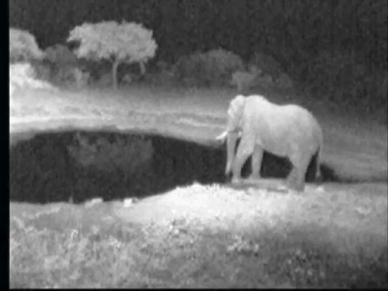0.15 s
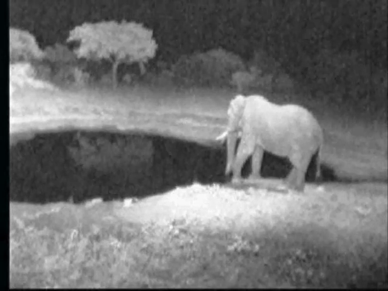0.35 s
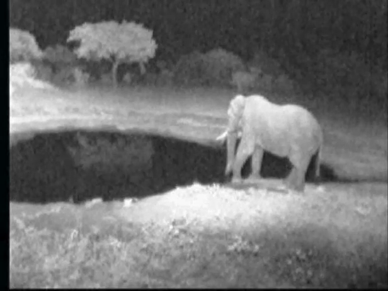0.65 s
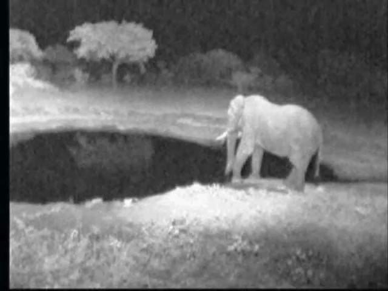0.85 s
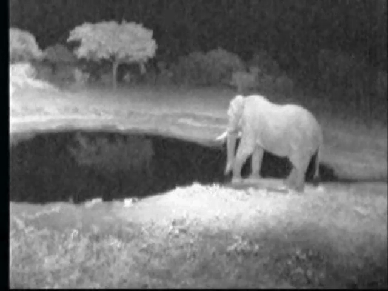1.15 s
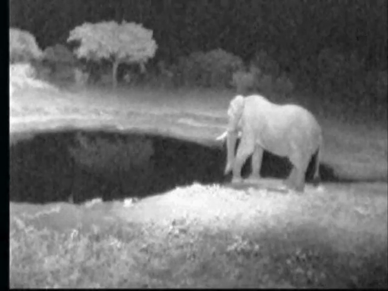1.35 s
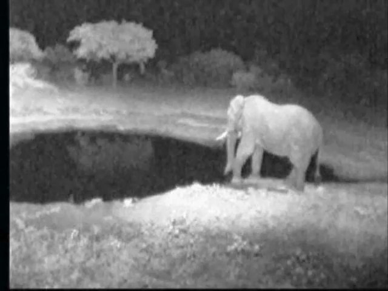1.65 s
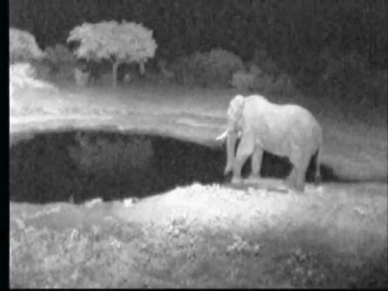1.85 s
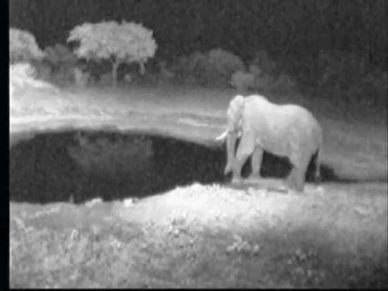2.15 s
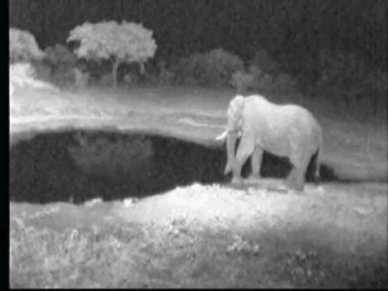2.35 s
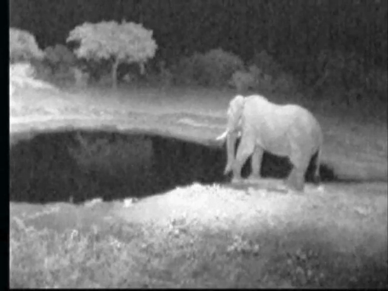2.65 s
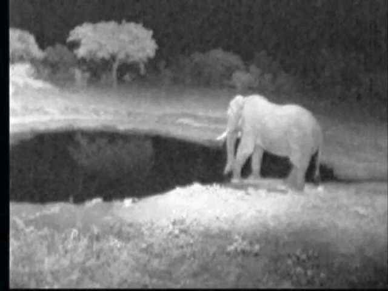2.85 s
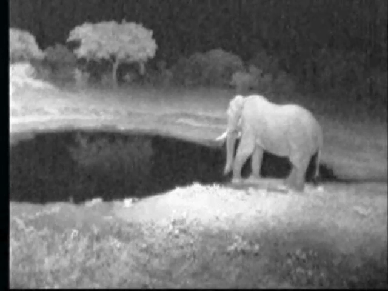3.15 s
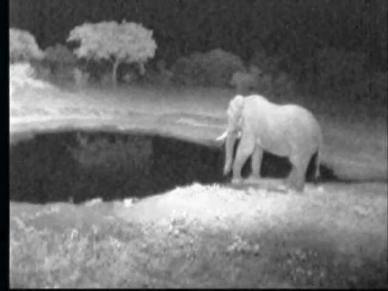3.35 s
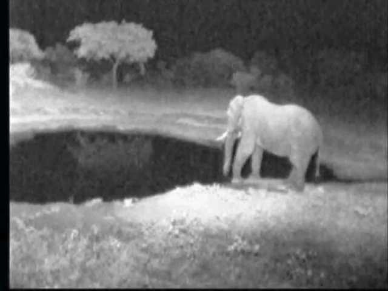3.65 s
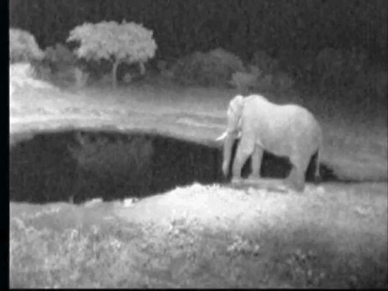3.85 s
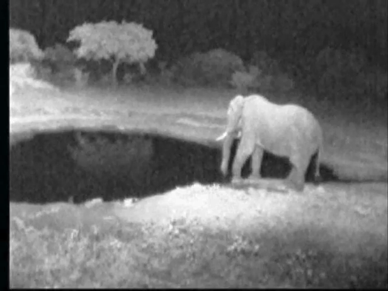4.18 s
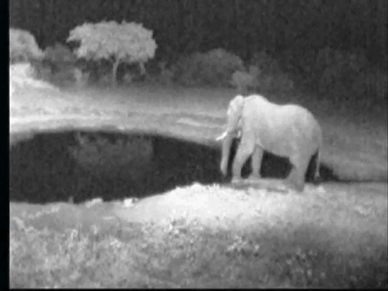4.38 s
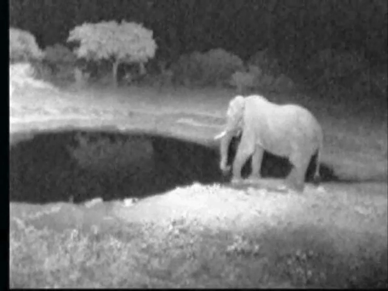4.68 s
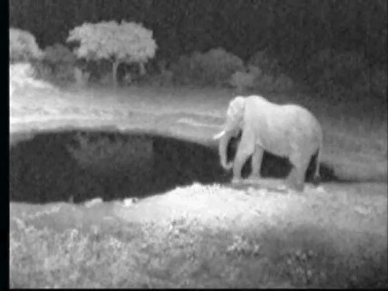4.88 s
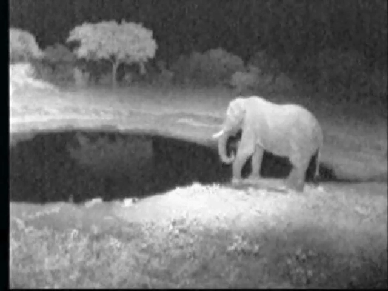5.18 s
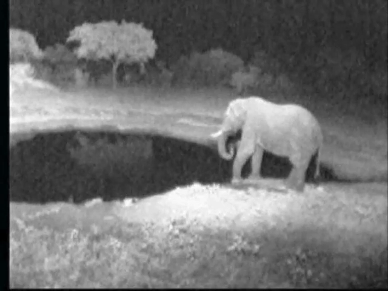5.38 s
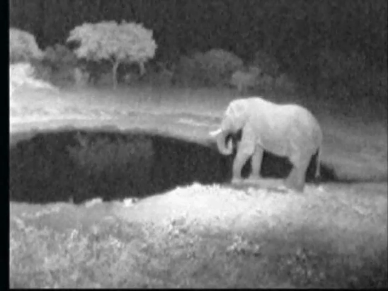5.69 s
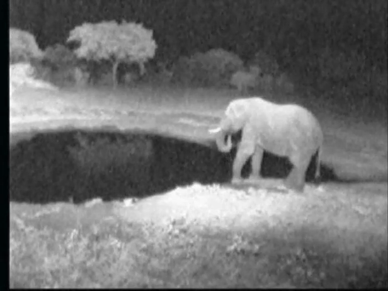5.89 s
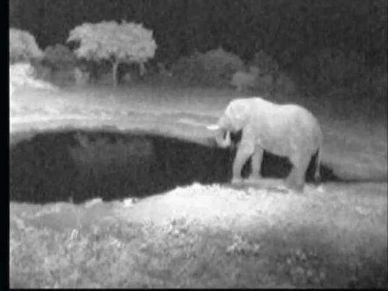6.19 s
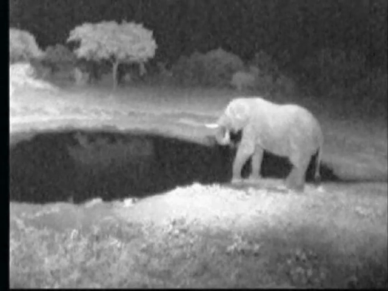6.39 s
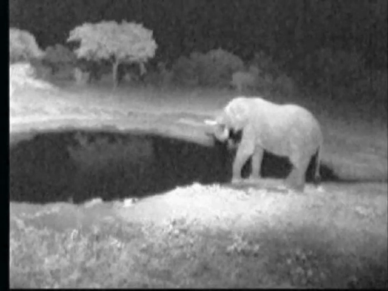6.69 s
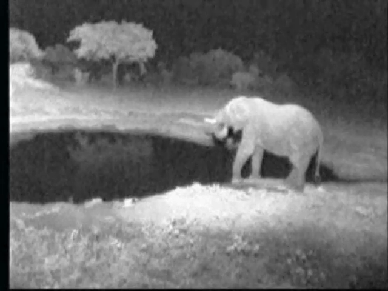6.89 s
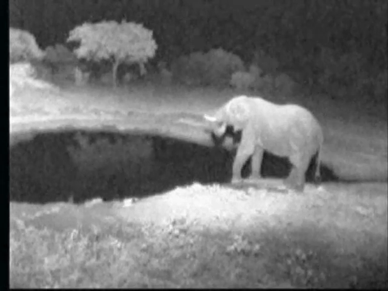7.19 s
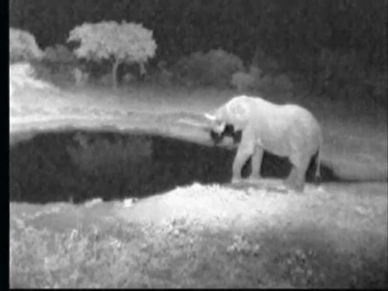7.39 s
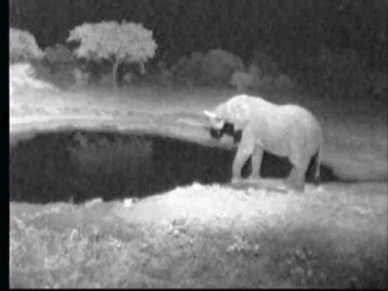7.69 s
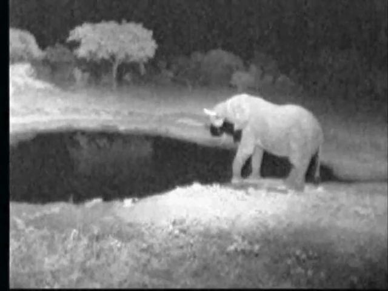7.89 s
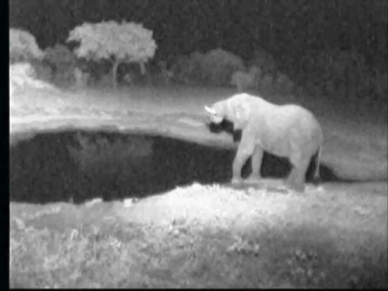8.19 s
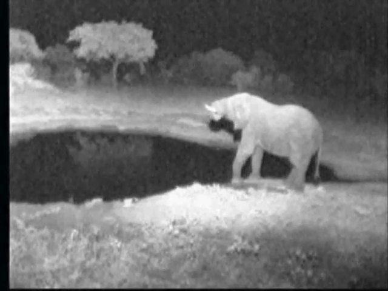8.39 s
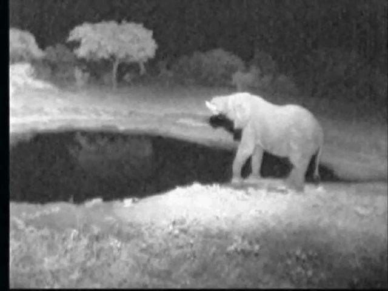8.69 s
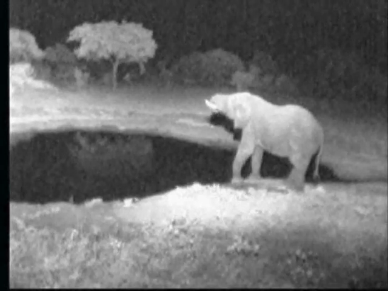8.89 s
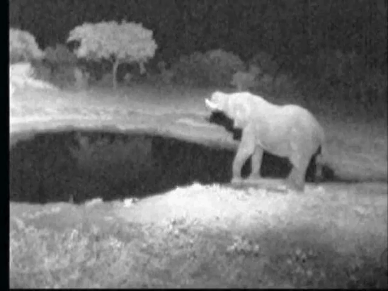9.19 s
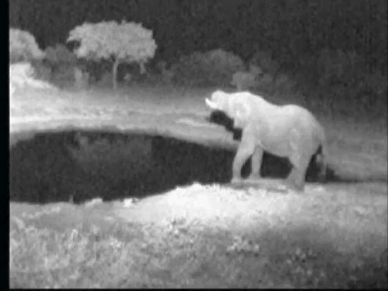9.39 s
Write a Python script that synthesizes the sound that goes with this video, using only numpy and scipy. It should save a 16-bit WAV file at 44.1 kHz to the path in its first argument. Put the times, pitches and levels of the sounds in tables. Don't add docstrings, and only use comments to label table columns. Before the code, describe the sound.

At a night waterhole, an elephant's trunk stirs and flings water in hissing splashes, then quiets to drips. Spills and slaps follow, then rapid hollow gulps as the trunk empties, ending in a sustained hard gush into the mouth. Reed frogs whistle pulsed trills near and far over a throbbing chorus. The outdoor microphone sounds coarse, buzzing and overloaded, with metallic treble.

```python
import sys
import numpy as np
from scipy import signal
from scipy.io import wavfile
from scipy.ndimage import uniform_filter1d

SR = 44100
rng = np.random.default_rng(int(sys.argv[2]) if len(sys.argv) > 2 else 0)


def volts(x):
    e = np.asarray(x, float) / 20
    return 10 ** e


def store_pcm(level_fs):
    pcm = np.round(np.clip(level_fs, -1, 1) * 32767).astype(np.int16)
    wavfile.write(sys.argv[1], SR, np.atleast_2d(pcm).T)


N = 420713


def read(points, hz):
    f, value = np.transpose(points)
    return np.interp(np.log(hz + 1), np.log(f + 1), value)


def follow(rows):
    s, *columns = np.transpose(rows)
    t = np.arange(N) / SR
    return [np.interp(t, s, c, left=-120, right=c[-1] if s[-1] > 9.5 else -120) for c in columns]


def evened(x):
    return x / np.sqrt(np.mean(x ** 2) + 1e-20)


def smooth(x, size):
    return uniform_filter1d(uniform_filter1d(x, size), size)


def add(mix, s, sound):
    at = round(s * SR)
    part = mix[max(at, 0):][:max(len(sound) + min(at, 0), 0)]
    part += sound[max(-at, 0):][:len(part)]


def resonate(x, hz, width):
    return signal.lfilter(*signal.iirpeak(hz, hz / width, SR), x)


def gliding(x, hz, width):
    turn, r = np.exp(2j * np.pi * np.cumsum(hz) / SR), np.exp(-np.pi * width / SR)
    once = signal.lfilter([1 - r], [1, -r], x / turn)
    return (turn * signal.lfilter([1 - r], [1, -r], once)).real


def band(x, lo_hz, hi_hz):
    return signal.sosfilt(signal.butter(2, [lo_hz, hi_hz], "band", fs=SR, output="sos"), x)


def hiss():
    return rng.standard_normal(N)


def lumps(ms, db):
    return volts(db * evened(smooth(hiss(), int(ms * SR / 1000))))


def noise(points, patchy_db):
    hz = np.fft.rfftfreq(512, 1 / SR)
    a, b, patches = rng.standard_normal((N // 128 + 5, 257, 3)).T
    patches = evened(uniform_filter1d(uniform_filter1d(patches, 5, 0), 6, 1))
    z = (a + 1j * b) * volts(read(points, hz)[:, None] + patchy_db * patches)
    return evened(signal.istft(z, nperseg=512, noverlap=384)[1][:N])


def bubbles(per_s, lo_hz, hi_hz, cycles, spread_db):
    out = np.zeros(N)
    for hz in np.geomspace(lo_hz, hi_hz, 10):
        born = rng.random(N) < per_s / 10 / SR
        size = volts(spread_db * np.minimum(rng.exponential(1, N), 4)) * born
        u = np.arange(2048) / SR * hz / cycles
        ring = np.sin(2 * np.pi * cycles * u * (1 + 0.076 * u))
        out += signal.oaconvolve(size, u * np.exp(-3 * u) * ring)[:N]
    return evened(out)


SURGE_DB = 33


def surge(s, db, rise_s, fall_s):
    late = np.arange(N) / SR - s
    return volts(db - SURGE_DB * np.where(late < 0, -late / rise_s, late / fall_s))


# f/Hz, level/dB per Hz
NIGHT_AIR = [(12, -28), (20, 2), (54, -14.5), (253, -14), (396, -26.5), (550, -11), (1040, -19),
             (1960, -17), (2200, -14), (5500, -13.5), (7150, -50), (12100, -120)]


def night():
    return volts(-38) * noise(NIGHT_AIR, 0.52)


# multiple of MAINS_HZ, level/dB
ODD_HUM = [(3, -6), (5, -5.5), (7, -17.5), (9, -15), (11, -10), (13, -17), (15, -18), (17, -23), (23, -30),
           (27, -17)]
# t/s, level/dB
ODD_HUM_SWELL = [(0.0, -46.5), (2.97, -41), (6.48, -34), (9.54, -33.5)]
# multiple of MAINS_HZ, level/dB
STEADY_HUM = [(1, -50.5), (2, -48.5), (4, -57)]
MAINS_HZ = 50.1


def hum():
    turn = 2 * np.pi * MAINS_HZ * np.arange(N) / SR
    odd = sum(volts(db) * np.sin(k * turn + 6 * rng.random()) for k, db in ODD_HUM)
    steady = sum(volts(db) * np.sin(k * turn + 6 * rng.random()) for k, db in STEADY_HUM)
    return np.sqrt(2) * (volts(follow(ODD_HUM_SWELL)[0]) * odd + steady)


CROAK_DB, CHORUS_DB = -34, -36.5


def chorus():
    low = resonate(resonate(hiss(), 2210, 130), 2210, 190) * lumps(9, 2) * lumps(150, 1.8)
    beside = resonate(resonate(hiss(), 2430, 150), 2430, 200) * lumps(9, 2.5) * lumps(200, 3)
    high = band(hiss(), 3990, 4680) * lumps(2.7, 2) * lumps(130, 1.5)
    croaks = evened(low) + volts(-11.5) * evened(beside)
    return volts(CROAK_DB) * croaks + volts(CHORUS_DB) * evened(high)


LEAD_DB_PER_S = 40
FULL_PULSE_S = .0133


def trill(last, length, ms, hz, full_db, start_db, full_s, grow_s, sweep,
          lag_s=.001, pulse_s=FULL_PULSE_S, sag_db=0):
    out, wobbles = np.zeros(N), rng.random((30, 3))
    for back, wobble in zip(np.arange(0, length, ms / 1000), wobbles):
        grown = np.clip(1 - (back - full_s) / grow_s, 0, 1)
        t = np.arange(0, .008 + (pulse_s - .008) * grown + .0025 * (back == 0), 1 / SR)
        end, middle = t[-1], t[-1] / 2
        glide = hz * (.955 + .045 * grown) + sweep * (middle - t) - 1200000 * (t - middle) ** 2
        turn = 2 * np.pi * (np.cumsum(np.maximum(glide, 3620)) / SR + wobble[1])
        swell = np.minimum(t / .003, 1) * np.sin(np.pi / 2 * np.minimum((end - t) / .0025, 1))
        swell = swell * volts(sag_db * np.maximum(t / end - .25, 0))
        lead = LEAD_DB_PER_S * max(back - full_s - grow_s, 0)
        db = full_db + start_db * (1 - grown) - lead + 1.5 * (wobble[0] - .5)
        start = last - back - middle + .0005 + lag_s * (1 - grown) + .0008 * (wobble[2] - .5)
        add(out, start, volts(db) * swell * np.sin(turn))
    return out


# t/s of last pulse's middle, length/s, pulse spacing/ms, f/Hz, full level/dB
REED_FROGS = [(.198, .3, 22.1, 4150, -14.5), (.078, .2, 22.4, 4480, -18), (1.992, .23, 22, 4090, -12),
              (2.692, .18, 20.8, 4570, -15.5), (2.792, .18, 21, 4400, -17.5), (2.994, .19, 21.7, 4350, -13),
              (3.1485, .28, 22, 4275, -13), (3.188, .13, 22, 4700, -19), (3.688, .3, 21, 4180, -18.5),
              (3.8145, .14, 21.6, 4680, -23), (4.08, .17, 20.9, 4000, -30), (5.004, .26, 22, 4080, -16),
              (5.6235, .17, 22.2, 4110, -14.5), (5.838, .2, 20.2, 4600, -20), (4.86, .17, 21.5, 4380, -19),
              (2.05, .12, 21, 4650, -20), (6.611, .21, 20.7, 4320, -20), (7.34, .13, 21, 4400, -18),
              (7.534, .27, 23, 4120, -22),
              (5.156, .2, 21.7, 4500, -17), (2.6, .13, 21.3, 4450, -19), (2.85, .26, 22, 4050, -23),
                 (2.95, .14, 21.2, 4600, -18), (3.45, .16, 21.4, 4150, -25), (3.83, .14, 22, 4020, -29),
                 (5.54, .09, 22, 4680, -18), (6.05, .2, 21, 4600, -23), (5.962, .1, 21, 4420, -15),
                 (.265, .05, 22, 4250, -25), (8.911, .19, 22.2, 4150, -10), (4.95, .1, 22, 4300, -21)]


def reed_frogs():
    return sum(trill(*row, start_db=-4.5, full_s=.45 * row[1], grow_s=.55 * row[1], sweep=43000, lag_s=0)
               for row in REED_FROGS)


# t/s of last pulse's middle, length/s, pulse spacing/ms, f/Hz, full level/dB
NEAR_FROGS = [(1.502, .3, 21.5, 4425, -2), (2.3388, .24, 21.5, 4400, -3.5), (4.5115, .32, 21.5, 4365, -2.2),
              (6.2765, .4, 21.4, 4366, -.6)]
LATE_FROGS = [(7.197, .23, 20.7, 4500, -9), (9.287, .33, 21.5, 4400, -3.5)]
# t/s of last pulse's middle, length/s, f/Hz, full level/dB
BANK_FROG = [(2.204, .27, 4235, 0), (5.214, 0.29, 4194, -2.5), (8.347, .33, 4224, -2.5)]
NEAR_START_DB, NEAR_SWEEP = -5.5, 58000
NEAR_FULL_S, NEAR_GROW_S = .17, .045


def near_frogs():
    out = np.zeros(N)
    for row in NEAR_FROGS:
        out += trill(*row, NEAR_START_DB, NEAR_FULL_S, NEAR_GROW_S, NEAR_SWEEP)
    for row in LATE_FROGS:
        out += trill(*row, NEAR_START_DB, .45 * row[1], .06, NEAR_SWEEP)
    for s, length, hz, db in BANK_FROG:
        out += trill(s, length, 22.2, hz, db, NEAR_START_DB, NEAR_FULL_S, NEAR_GROW_S,
                     sweep=60000, pulse_s=.012, sag_db=-10)
    return out


def frogs():
    near, far = near_frogs(), reed_frogs()
    t = np.arange(8000) / SR
    reeds = rng.standard_normal(len(t)) * volts(-60 * t / 0.52) * (t > .002)
    echo = signal.oaconvolve(volts(-20) * near + volts(-7) * far, reeds / np.linalg.norm(reeds))[:N]
    bounce = volts(-13) * np.roll(near, round(0.0042 * SR))
    return near + far * lumps(3.4, .9) + echo + bounce


# peak t/s, level/dB, rise/s, fall/s
AIR_BLASTS = [(1.042, -48.5, 0.34, 0.22), (1.18, -37, 0.033, .6), (1.35, -33, 0.31, 0.24),
              (4.15, -53, .03, .6), (4.22, -49, .1, .2), (4.304, -47, 0.33, 0.16), (7.308, -48, 0.44, .15),
              (8.459, -25.5, 0.045, 0.051), (8.654, -51, 0.12, .2), (9.2, -45, 0.28, 0.39)]


def blasts():
    puff = evened(band(hiss(), 17, 150) * lumps(30, 2.2))
    return volts(9) * sum(surge(*row) for row in AIR_BLASTS) * puff


THUMP_S, THUMP_DB, THUMP_HZ = 8.446, -14, 32


def thump():
    out, t = np.zeros(N), np.arange(0, 1.3 / THUMP_HZ, 1 / SR)
    add(out, THUMP_S, volts(THUMP_DB) * np.sin(2 * np.pi * THUMP_HZ * t) * np.hanning(len(t)))
    return out


def slap(db, hz, low_db):
    t = np.arange(2200) / SR
    a, b, c = rng.standard_normal((3, len(t)))
    wide = evened(band(a, 2570, 4430)) * volts(-14) + evened(band(b, 660, 2000)) * volts(low_db - 22)
    wide = wide * volts(0.5 - 60 * np.maximum(t - 0.0023, 0) / 0.073)
    ring = evened(resonate(c, hz, 210)) * 0.22 + np.sin(2 * np.pi * hz * t * (1 + t)) * .5
    ring = ring * volts(-60 * t / 0.044)
    smack = volts(low_db / 3 - 12.5) * evened(band(c, 500, 5600)) * volts(-60 * t / 0.016)
    return volts(db + 1.5) * np.minimum(t / 0.0011, 1) * (wide + ring + smack)


# t/s, peak level/dB, ring f/Hz, low part level/dB re peak
POOL_SLAPS = [(0.2934, -10.5, 2430, -23), (0.5136, -11, 3300, 2), (.646, -13, 2890, -28),
              (0.881, -3, 3830, -20), (0.948, -11, 3240, -6), (1.733, -11, 1490, 8), (1.0274, -17, 3200, 0),
              (1.074, -9, 3240, -19), (1.1755, -4, 2560, -26), (5.412, -12, 2530, 17),
              (5.452, -24, 2860, -22), (5.657, -11, 2820, -23), (5.676, -9.5, 3570, -25),
              (5.735, -12.5, 2660, 8.5), (5.8205, -7, 2600, -25), (5.901, -6.5, 2650, -30),
              (6.525, -11.5, 2340, 12), (7.8065, -3.5, 2880, 7), (8.329, -31, 2720, -22),
              (8.4214, -11, 2720, 20.5)]
# t/s, peak level/dB, ring f/Hz
STREAM_SPATTER = [(0.3777, -10, 3320), (0.414, -8.5, 3580), (0.8544, -9, 2940), (6.709, -12, 2920),
                  (6.8786, -8, 2820), (7.632, -8.5, 2400), (7.753, 1.5, 3100), (7.8667, -9, 3060),
                  (7.8926, -8, 2610), (8.062, -10, 2590), (8.167, -10, 2420), (8.2594, -13, 3100),
                  (4.472, -13, 2760), (4.658, -11, 3300), (4.823, -16, 2470), (4.8411, -12, 2800),
                  (7.4127, -10, 3060), (7.575, -7, 3260), (7.7835, -9, 3220), (8.2814, -14, 3080),
                  (5.469, -4, 3500), (5.477, -6, 2000)]
# t/s after the start, peak level/dB, ring f/Hz
DRIBBLE_RHYTHM = [(-.001, -2.5, 3010), (.004, -1.5, 2630), (.0272, -1, 2390), (0.068, -1, 2650),
                  (.072, -0.5, 2950), (0.1153, -5, 2660), (.119, -1, 3000), (0.1587, 2.5, 2680),
                  (0.307, -0.5, 2600), (0.358, -5, 3280), (0.449, -8, 2770), (0.496, -7.5, 2470),
                  (.532, 1.5, 2760), (0.604, -7.5, 3320), (0.7, -10.5, 2550), (0.766, 0, 2770),
                  (.869, -7, 2670), (1.13, -11.5, 2940)]
# start t/s, level/dB
DRIBBLE_STARTS = [
    (4.1373, 0),
    (7.148, -3.5),
]
GOB_DB, GOB_THIN_DB_PER_S = 3, 65


def slaps():
    hits = [*POOL_SLAPS]
    for start, run_db in DRIBBLE_STARTS:
        for s, db, hz in DRIBBLE_RHYTHM:
            hits.append((start + s, db + run_db, hz, GOB_DB - GOB_THIN_DB_PER_S * s))
    for s, db, hz in STREAM_SPATTER:
        hits.append((s, db, hz, -22))
    out = np.zeros(N)
    for s, *shape in hits:
        add(out, s - .001, slap(*shape))
    return out


def note(db, start_hz, end_hz, length):
    u = np.linspace(0, 1, int(max(length, .008) * SR))
    turn = 2 * np.pi * np.cumsum(start_hz + (end_hz - start_hz) * u ** 1.37) / SR
    wet = volts(2.4 * evened(smooth(rng.standard_normal(len(u)), 200)))
    ratio, share, phase = rng.random(3)
    second = np.sin(turn * (1.17 + 0.074 * ratio) + 6 * phase)
    pair = np.sin(turn) + (0.11 + 0.2 * share) * second
    return volts(db - 5) * np.sin(np.pi * u ** 0.35) ** 2 * pair * wet


# t/s, peak level/dB, f/Hz
BIG_GLUGS = [(0.429, -12.5, 1306), (.721, -7, 1480), (.755, -9.5, 1600), (.69, -9, 1600), (1.618, -9, 702),
             (1.652, -10.5, 700), (1.682, -16, 720), (0.55, -4, 2500), (.565, -8, 1850), (3.066, -10, 533),
             (5.207, -17.5, 1510), (5.412, -6.5, 1600), (5.413, -16.5, 900), (5.414, -8, 1500),
             (5.918, -3, 638), (5.945, -13, 570), (6.011, -9, 570), (5.6, -19, 550), (6.085, -12, 470),
             (0.36, -27, 560), (6.1, -15, 560), (5.568, -19, 1820)]
# t/s, peak level/dB, f/Hz
TRUNK_GULPS = [(6.41, -25, 549), (6.463, -21, 568), (6.517, -13, 690), (6.551, -16.5, 685),
               (6.614, -5.5, 541), (6.645, -10, 602), (6.683, -2, 611), (6.795, 0, 575), (6.878, -4, 604),
               (6.909, -2.5, 629), (6.931, -2, 572), (6.982, -1, 546), (7.023, -4.5, 619), (7.059, -8, 608),
               (7.088, -4, 526), (7.224, -10, 577), (7.262, -15, 606), (7.298, -10, 500), (7.356, -15, 540),
               (7.397, -4, 632), (7.441, -11.5, 631), (7.509, -13.5, 552), (7.554, -8.5, 571),
               (7.59, -2, 536), (7.673, -9, 565), (7.699, -11, 604), (7.795, -17, 535), (7.864, -23, 535),
               (7.901, -13.5, 520), (7.952, -18, 790), (7.997, -18, 625), (8.04, -15.5, 704),
               (8.068, -19, 520), (8.102, -25, 850), (8.133, -15.5, 806), (8.243, -16, 525),
               (8.317, -21, 696), (8.384, -7, 744), (8.433, -19, 549), (8.466, -17, 637),
               (8.505, -5.5, 516), (8.535, 1, 538)]
# t/s, peak level/dB, start f/Hz, end f/Hz, length/s
AIR_PLOPS = [(0.326, -23, 950, 1050, 0.02), (.565, -16, 508, 560, 0.053), (0.659, -17, 670, 720, 0.057),
             (0.709, -14, 970, 1030, 0.06), (.74, -14, 932, 1050, 0.074), (0.978, -12, 560, 1500, 0.06),
             (1.021, -6, 1350, 5200, 0.026), (.962, -19, 1600, 2800, 0.018),
             (1.111, -12, 1030, 2520, 0.014), (1.44, -5.5, 623, 760, 0.029), (1.465, -11, 1270, 1500, 0.03),
             (4.204, -3, 630, 690, 0.012), (4.421, -12, 780, 890, 0.022), (4.136, -20, 640, 600, 0.015),
             (.42, -18, 1070, 1200, .02), (6.01, -17, 1200, 1300, 0.021), (8.44, 0, 2600, 2780, 0.035),
             (8.515, -2, 3340, 3570, 0.026), (8.63, -5, 3420, 3550, 0.067), (6.71, -15, 1870, 1910, 0.035),
             (1.65, -8, 1180, 1360, 0.05), (2.4, -35, 670, 700, 0.045), (2.42, -15.5, 2980, 3260, 0.04),
             (3.078, -8.5, 591, 517, 0.063), (4.55, -25, 560, 590, 0.055), (5.452, -8, 2920, 2570, 0.022),
             (5.467, -8, 1960, 2130, 0.022), (6.1, -16, 525, 560, 0.061), (5.685, -8.5, 530, 1030, 0.018),
             (5.917, -13, 950, 820, 0.029), (6.736, -20, 1126, 1160, 0.15), (6.925, 8, 515, 614, 0.06),
             (7.004, -16.5, 1084, 1290, 0.12), (7.215, -10, 1095, 1070, 0.054),
             (7.335, -9.5, 1070, 1110, 0.032), (8.33, -19, 725, 743, 0.18), (8.545, 5, 571, 604, 0.048)]


def big_bubbles():
    out = np.zeros(N)
    for s, db, hz in BIG_GLUGS:
        add(out, s - .003, note(db - 0.5, hz * .98, hz * 1.176, .022 + 14.7 / hz))
    for s, db, hz in TRUNK_GULPS:
        add(out, s - .003, note(db + 3.5, hz * .97, hz * 1.07, .022 + 14.7 / hz))
    for s, *shape in AIR_PLOPS:
        add(out, s, note(*shape))
    return out


def drops():
    return band(band(band(slaps() + big_bubbles(), 430, 9500), 420, 9500), 400, 9500)


# f/Hz, width/Hz, level/dB
THROAT = [(590, 133, -10), (1452, 100, -13), (2000, 110, -9), (2320, 92, -6.5), (3320, 110, -10),
          (5530, 450, -14)]
# t/s, level/dB
THROAT_LEVEL = [(8.4, -43), (8.6, -18.5), (8.93, -11.5), (8.99, -7.5), (9.24, -8.5), (9.54, -9)]
# t/s, lower f/Hz, upper f/Hz
SPLIT_CAVITY = [
    (8.4, 2620, 2700),
    (8.95, 2600, 2700),
    (9.03, 2510, 2900),
    (9.3, 2560, 2920),
    (9.4, 2680, 2800),
    (9.54, 2640, 2780),
]
# t/s, level/dB
THROAT_RUMBLE = [(8.4, -66), (8.456, -34.5), (9.54, -23.5)]


def jet():
    rush = hiss() * lumps(6, 1.4)
    ring = np.zeros(N)
    for hz, width, db in THROAT:
        ring += volts(db) * evened(resonate(resonate(rush, hz, width), hz, 2 * width))
    lower, upper = (evened(gliding(rush, np.maximum(hz, 2500), 140)) for hz in follow(SPLIT_CAVITY))
    ring += volts(0.5) * lower * lumps(40, 1) + volts(-1.5) * upper * lumps(40, 1.3)
    rumble = band(hiss(), 262, 370) * lumps(25, 0.95)
    return volts(follow(THROAT_LEVEL)[0]) * evened(ring) + volts(follow(THROAT_RUMBLE)[0]) * evened(rumble)


# f/Hz, level/dB per Hz
SPRAY_COLOUR = [(1000, -30.5), (1700, -3), (2150, -6), (2900, 2.5), (3550, -1.5), (3750, 2), (5500, -5.5),
                (7150, -11), (12100, -120)]


def spray():
    return evened(noise(SPRAY_COLOUR, 2.6) * lumps(8.5, 1.25) + 0.53 * bubbles(900, 2092, 4360, 10.1, 4.2))


def water_body():
    churn = evened(band(hiss(), 850, 1730) * lumps(12, 3.6))
    return evened(churn + 0.26 * bubbles(600, 700, 2040, 4.2, 3.2))


# f/Hz, width/Hz, level/dB
AIR_COLUMN = [(530, 85, 8), (616, 39, -0.5), (770, 24, -34), (1050, 72, -6)]


def trunk_gurgle():
    rush = hiss() * lumps(14, 3.3)
    ring = sum(volts(db) * resonate(rush, hz, width) for hz, width, db in AIR_COLUMN)
    for lo_hz, hi_hz in ((460, 1300), (450, 1800), (440, 2500), (430, 3000)):
        ring = band(ring, lo_hz, hi_hz)
    return evened(evened(ring) + .4 * band(bubbles(160, 510, 800, 8, 1.8), 440, 2500))


# t/s, flow level/dB, trunk air level/dB
STIRRING = [
    (0, -52, -51.5),
    (.496, -22, -44),
    (.568, -17.5, -26),
    (.78, -19, -34),
    (.84, -24, -51.5),
    (1.305, -11.5, -24),
    (1.689, -19.5, -27.5),
    (1.811, -28, -46),
    (2.1, -61, -63),
]
# t/s, flow level/dB, trunk air level/dB
POURING = [
    (6.4, -49, -35.5),
    (6.72, -27.5, -13),
    (6.958, -24, -10),
    (7.03, -29.5, -18.5),
    (7.546, -21.5, -17.5),
    (8.418, -27.5, -27.5),
    (8.424, -14.5, -39),
    (8.478, -9.5, -14),
    (9.54, -9.5, -33),
]
# peak t/s, flow level/dB, air level/dB, rise/s, fall/s
SHORT_SPILLS = [(.513, -20, -55, .008, 0.44), (.949, -19.5, -55, .006, 0.22),
                (1.078, -21, -55, 0.027, 0.44), (1.176, -24, -48, .015, 0.54),
                (2.441, -29.5, -24, 0.24, 0.3), (2.96, -46, -58, 1, 0.41), (3.11, -64, -29, 0.33, 0.4),
                (4.136, -25.5, -21.5, 0.008, 0.16), (4.18, -31, -28.5, 0.023, 1.55),
                (4.58, -32.5, -30.5, 0.59, 0.5), (4.93, -39.5, -69, 2.8, 0.82),
                (5.422, -19.5, -55, 0.12, 0.075), (5.465, -11.5, -48, 0.092, 0.074),
                (5.52, -37.5, -62, 0.16, 16.5), (6.09, -35.5, -26, 1.64, 0.21)]
STILL_DB = -50.5
AIR_STEEP, FIZZ_SLOPE = 2.5, 1.5


def water():
    t = np.arange(N) / SR
    (stir, sucked), (pour, air) = volts(np.array([follow(STIRRING), follow(POURING)]))
    pour = pour * volts(-7.5 * np.clip((t - 8.65) / .35, 0, 1))
    rest = pour + volts(STILL_DB)
    for s, flow_db, air_db, rise_s, fall_s in SHORT_SPILLS:
        shape = surge(s, 0, rise_s, fall_s)
        rest = rest + volts(flow_db) * shape
        air = air + volts(air_db) * shape ** AIR_STEEP
    flow = stir + rest
    heft = volts(-22.5) * stir + volts(8.5) * sucked + volts(-12) * rest + volts(-12) * air
    mist = evened(band(hiss(), 4400, 5600) * lumps(2.4, 1))
    out = volts(2.5) * flow * spray() + volts(-3.5) * flow ** FIZZ_SLOPE * mist
    out = out + volts(-5.5) * heft * water_body() + volts(-4) * (air + sucked) * trunk_gurgle()
    out = out - 0.52 * np.clip((t - 9.5) / 0.28, 0, 1) * band(out, 4840, 5900)
    return out - .8 * resonate(out, 1260, 220) * (abs(t - 7.4) < 1.01)


def scene():
    surroundings = night() + hum() + chorus() + frogs()
    elephant = blasts() + thump() + drops() + jet() + water()
    return (surroundings + elephant)[None]


# from t/s, to t/s
TOP_BAND_GAPS = [(0.01, 0.09), (2.24, 2.305), (6.165, 6.26), (2.55, 3.23), (3.38, 3.4), (3.73, 3.89),
                 (4.53, 4.56), (7.1, 7.17), (7.19, 7.25)]


def starved(x):
    hz, t, z = signal.stft(x, SR, nperseg=2048)
    power = abs(z) ** 2
    loud = power[:, (hz > 2000) & (hz < 8000)].mean(1, keepdims=True)
    nearby = uniform_filter1d(uniform_filter1d(power, 3, 1), 3, 2)
    weak = nearby < np.sqrt(loud) * volts(2 * -53.5)
    mute = weak & ((hz > 9200) & (hz < 13000))[:, None]
    masked = uniform_filter1d(power, 16, 1) < loud * volts(2 * -23.5)
    thinned = 1 - .8 * (masked & ((hz > 5000) & (hz < 6000))[:, None])
    for start, end in TOP_BAND_GAPS:
        mute = mute | (hz > 13400)[:, None] & (t > start - .012) & (t < end + .012)
    return signal.istft(z * ~mute * thinned, SR, nperseg=2048)[1][:, :N]


def low_pass(x):
    return signal.sosfilt(signal.butter(12, 15670, fs=SR, output="sos"), x)


def record(dry):
    narrow = signal.oaconvolve(dry, signal.firwin(301, 5750, fs=SR)[None], "same")
    coarse = narrow[:, ::4] + 0.015
    coarse = coarse / (1 + abs(coarse / 1.08) ** 10) ** (1 / 10)
    held = np.repeat(coarse, 4, axis=1)[:, :N]
    held = signal.oaconvolve(held, signal.firwin(301, 15650, fs=SR)[None], "same")
    return low_pass(np.clip(starved(held), -1, 1))


dry = scene()
out = record(dry)
store_pcm(out)
```